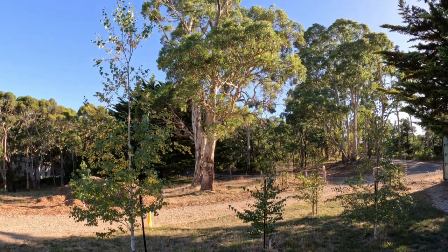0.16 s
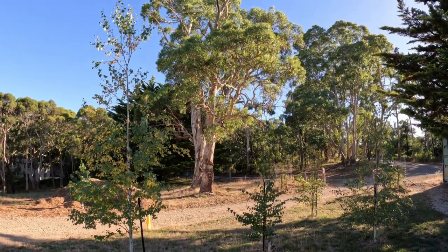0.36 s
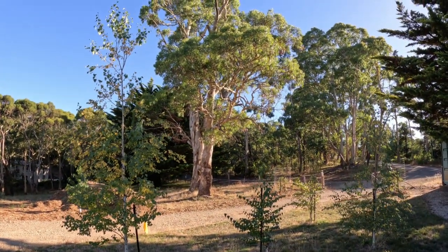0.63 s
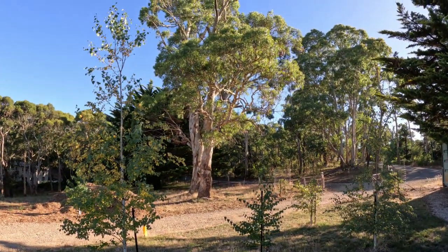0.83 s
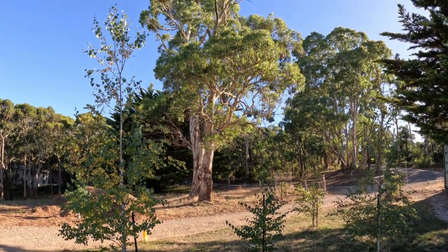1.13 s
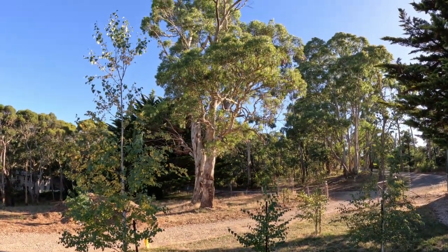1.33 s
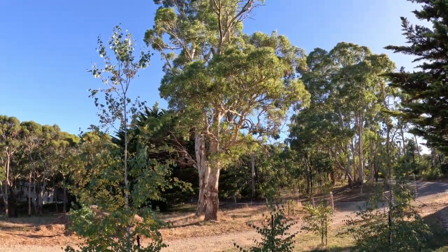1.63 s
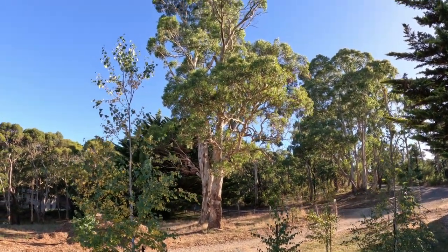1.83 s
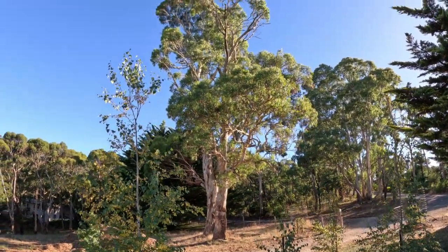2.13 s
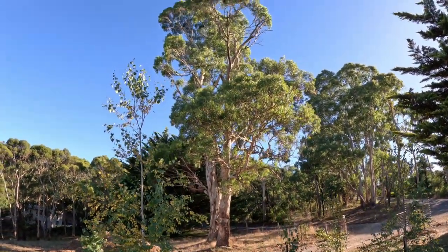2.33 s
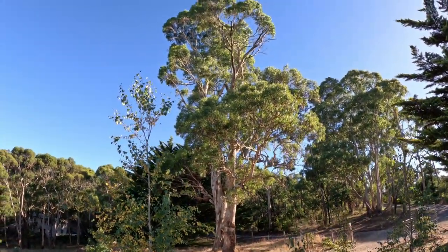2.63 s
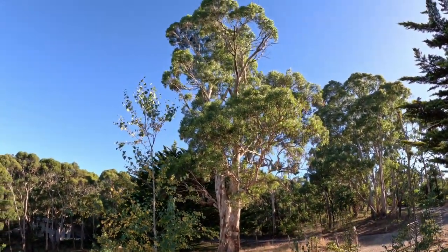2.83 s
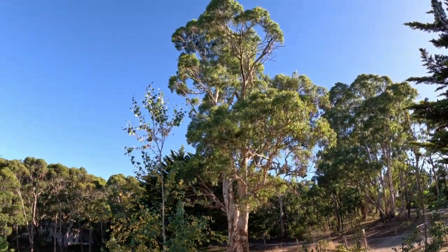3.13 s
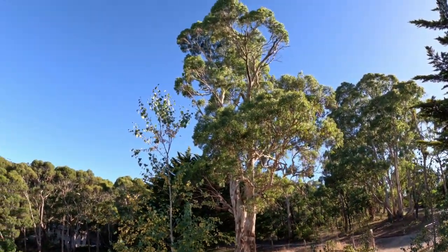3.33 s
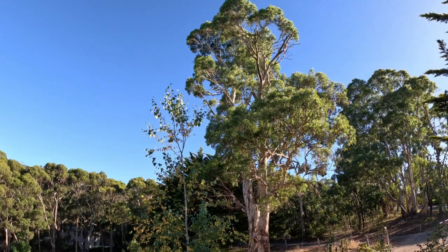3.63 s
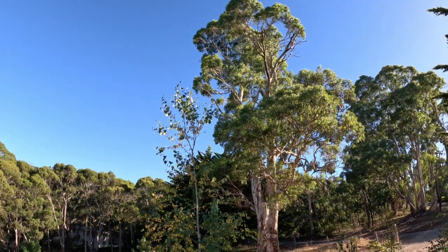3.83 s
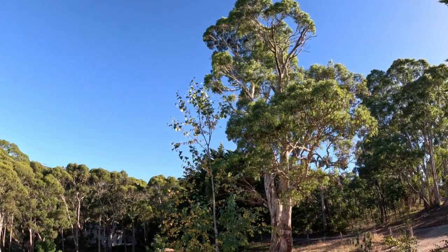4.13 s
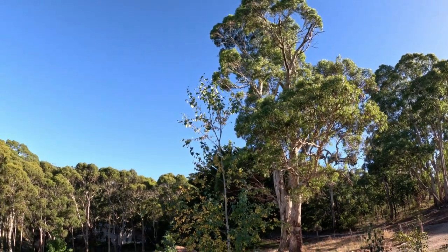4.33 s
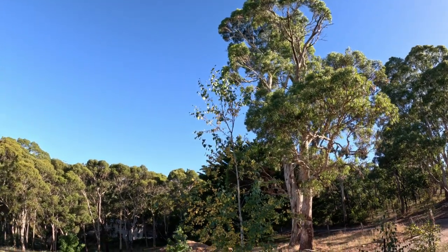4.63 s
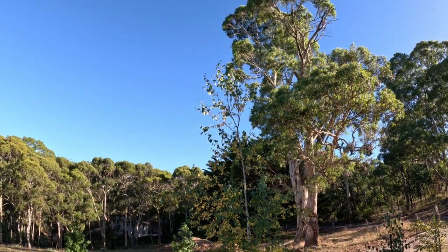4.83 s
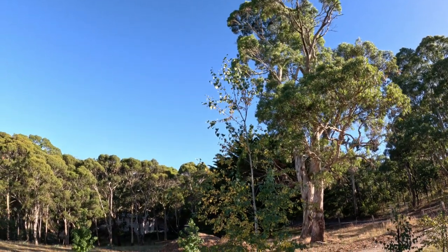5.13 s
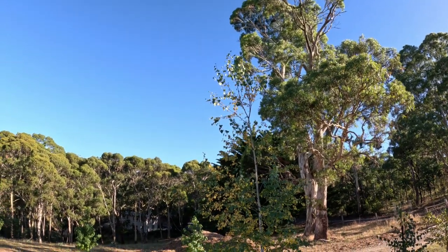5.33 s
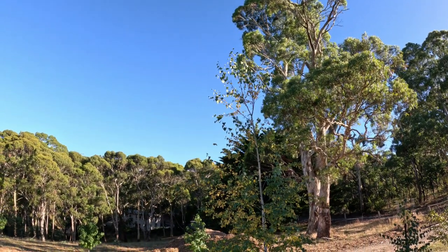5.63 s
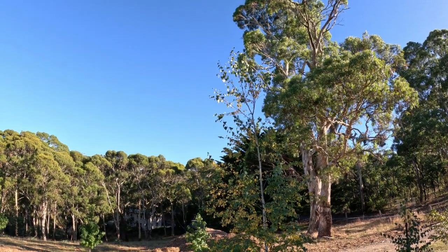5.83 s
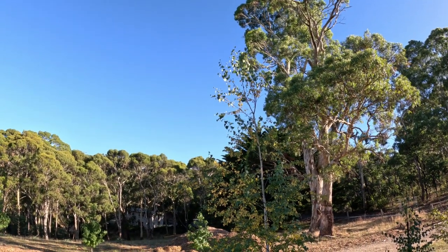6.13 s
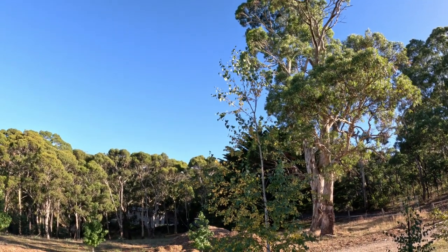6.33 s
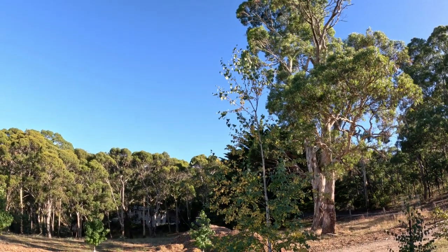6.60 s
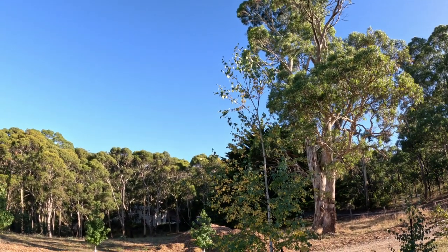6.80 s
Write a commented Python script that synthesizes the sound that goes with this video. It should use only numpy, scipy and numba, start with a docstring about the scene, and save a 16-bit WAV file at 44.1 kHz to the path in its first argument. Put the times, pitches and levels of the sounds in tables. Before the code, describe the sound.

Outdoors among scattered eucalypts, a cockatoo is already screeching as the stereo hand-held microphone is knocked with low, boomy thumps. More birds join in a nearly continuous run of rough, bright, rasping calls, shifting slightly left and right. Brief thin squeals and a quick falling squawk near six seconds add variety. Trunks and leaves scatter a soft diffuse tail over distant flock noise, light early wind buffeting and faint low rumble.

```python
"""A cockatoo is already screeching as hard bumps thud on the hand-held microphone; others follow from tall gum trees.
Each screech is a ragged train of pulses through the bird's throat, scattered by trunks and leaves.
Short clear squeals are gliding harmonic tones, and a late squawk slides down through fixed resonances.
Beneath lie a farther flock, a light breeze, rumble, hum and a passing drone, all shaped from noise."""
import sys
import numpy as np
from scipy import signal
from scipy.fft import rfft, irfft, next_fast_len
from scipy.io import wavfile
from scipy.ndimage import map_coordinates
from numba import njit

SR = 44100
rng = np.random.default_rng(int(sys.argv[2]) if len(sys.argv) > 2 else 0)


def wav_record(signal):
    """Record a signal, one row per channel, as 16-bit PCM in the file named by sys.argv[1]."""
    frames = np.transpose(np.atleast_2d(signal))
    bounded = np.clip(frames, -1, 1)
    # unit amplitude maps onto the largest positive 16-bit level
    quanta = np.round(bounded * 32767).astype(np.int16)
    wavfile.write(sys.argv[1], SR, quanta)


N = 306936
TOP_HZ = 15200  # upper limit of the sound


def amp(db):
    """Decibels to gain."""
    return 10 ** (np.asarray(db) / 20)


def unit(x):
    """Scale to rms 1."""
    return x / np.sqrt(np.mean(x ** 2) + 1e-20)


def along(points, hz):
    """(Hz, value) points read on a log axis."""
    f, v = np.transpose(points)
    return np.interp(np.log(hz + 1), np.log(f + 1), v)


def curves(rows):
    """One value per sample for each column after the time."""
    s, *cols = np.transpose(rows)
    return [np.interp(np.arange(N) / SR, s, c) for c in cols]


def wobble(rate, n):
    """A smooth random curve of n samples, rate knots a second."""
    knots = rng.standard_normal(int(n * rate / SR) + 4)
    return map_coordinates(knots, [np.arange(n) * rate / SR])


def filtered(x, gain):
    """x times a gain of frequency."""
    n = x.shape[-1]
    m = next_fast_len(n + 4096)
    return irfft(rfft(x, m) * gain(np.fft.rfftfreq(m, 1 / SR)), m)[..., :n]


def noise_band(shape, centre_hz, width_hz):
    """Noise of rms 1 in a bell-shaped band."""
    bell = lambda hz: np.exp(-((hz - centre_hz) / width_hz) ** 2)
    return unit(filtered(rng.standard_normal(shape), bell))


def spread(spectrum, side_db):
    """Stereo noise of rms 1 with the given spectrum; side_db sets its width."""
    noise = filtered(rng.standard_normal((2, N)), lambda hz: amp(along(spectrum, hz)))
    mid, side = noise * amp([[0], [side_db]])
    return unit(np.array([mid + side, mid - side]))


def placed(x, pan_db, centre_lag=0.32, lag_per_db=0.09):
    """Stereo from mono: the left is louder by pan_db, and its lag in samples grows with pan_db."""
    lag = centre_lag + lag_per_db * pan_db
    left = map_coordinates(x, [np.arange(len(x)) - lag], mode="nearest")
    return np.array([left, x]) * amp([[pan_db / 2], [-pan_db / 2]])


@njit
def bandpass(x, tuning, damping):
    """A two-pole resonator that is retuned at every sample."""
    out, a, b = np.zeros(len(x)), 0.0, 0.0
    for i in range(len(x)):
        g, k = tuning[i], damping[i]
        band = (g * (x[i] - b) + a) / (1 + g * (g + k))
        a, b = 2 * band - a, b + 2 * g * band
        out[i] = k * band
    return out


def resonance(x, hz, db, width):
    """Raise one resonance in x; hz and db may move, width is a share of hz that narrows as db rises."""
    ones = np.ones(len(x))
    tuning = ones * np.tan(np.pi * hz / SR)
    damping = ones * width / amp(db / 2)
    return x + (amp(db) - 1) * bandpass(x, tuning, damping)


def syrinx(n, rate, rough, drift=.14, jitter=.22, scatter_db=1.1, hiss=0.96, alternate_db=-1.5, puff_hz=9500):
    """Sharp pulses of uneven spacing and size, strong and weak by turns, each followed by a duller puff of turbulence."""
    unevenness = drift * wobble(25, n) + jitter * wobble(260, n)
    cycles = np.cumsum(rate * np.exp(rough * unevenness)) / SR
    pulses = unit(np.diff(np.floor(cycles), prepend=0))
    puffs = unit(rng.standard_normal(n) * np.exp(-1.1 * (cycles % 1)))  # fading through each cycle
    puffs = filtered(puffs, lambda hz: 1 / np.sqrt(1 + (hz / puff_hz) ** 4))
    share = np.clip(hiss * rough, 0, .9)
    size_db = scatter_db * np.tanh(wobble(300, n)) + alternate_db * np.cos(np.pi * np.floor(cycles))
    return (np.sqrt(1 - share) * pulses + np.sqrt(share) * puffs) * amp(rough * size_db)


# broad colour of the throat: pitch_hz [Hz], gain_db [dB]
THROAT = [(240, -60), (400, -33.5), (712, -19), (841, -22.5), (935, -13), (1070, -15.5), (1590, -13.5),
          (1830, -10), (2130, -3.5), (2920, -2.5), (5270, -9), (7240, -17), (8300, -25), (9810, -27.5),
          (11200, -41), (15000, -49.5)]


def throat(x, size=2048):
    """Give x the broad colour of the throat."""
    gain = amp(along(THROAT, np.fft.rfftfreq(size, 1 / SR)))
    cepstrum = irfft(np.log(gain + 1e-6))
    cepstrum[1:size // 2] *= 2
    cepstrum[size // 2 + 1:] = 0  # causal: the ringing follows each pulse
    return signal.fftconvolve(x, irfft(np.exp(rfft(cepstrum))))[:len(x)]


def flutter(x, depth_db, bins=2.2, frames=10, size=512):
    """Narrow streaks of the spectrum swell and fade at random."""
    overlap = size * 3 // 4
    z = signal.stft(x, nperseg=size, noverlap=overlap)[2]
    bell = lambda w: np.exp(-.5 * (np.arange(-40, 41) / w) ** 2)
    streak = np.outer(bell(bins / 2), bell(frames / 2))
    field = signal.fftconvolve(rng.standard_normal(z.shape), streak, "same")
    return signal.istft(z * amp(depth_db * unit(field)), nperseg=size, noverlap=overlap)[1][:len(x)]


def steady(x, hold=0.0082):
    """Divide x by its short-time strength, so that a cry stays level beneath its ragged pulses."""
    power = signal.fftconvolve(x * x, np.hanning(int(2 * hold * SR) + 3), "same")
    return x / np.sqrt(abs(power) + 1e-12)


def bend(x, octaves):
    """Slide all frequencies of x along a curve, keeping its length."""
    place = np.cumsum(2 ** octaves)
    return map_coordinates(x, [place * (len(x) - 1) / place[-1]], mode="mirror")


def gate(t, start, end, attack, release):
    """Rounded rise after start, hold, and rounded fall to end."""
    return np.sin(np.pi / 2 * np.clip(np.minimum((t - start) / attack, (end - t) / release), 0, 1))


CRESCENDO_POWER = 2.8  # the push comes late in the cry
RASP_GROWS, LOW_GROWS = 1.1, 0.96  # dB of rasp and of low throat for each dB of effort
# a strong rasp reaches higher: dB per octave of tilt for each dB above the usual rasp level (dB)
RASP_TILT, USUAL_RASP_DB = 0.34, -44
# each resonance strays on its own: share of its frequency at full roughness, knots per s, strength (dB)
WANDER, WANDER_PER_S, RING_WAVER_DB = 0.021, 17.8, 1.7
# the cries, levels before the mix: start_s, end_s, attack_s, release_s [s], level_db, crescendo_db [dB],
# low_db, rasp_db [dB against the main band], pan_db [dB, plus = left], rate [pulses per s, before drift],
# rough [0-1], glide [octaves from start to end], low_ring_db (lowest resonance), first_db, last_db
# (middle two, at start and end), top_ring_db (highest) [dB, before waver], four throat resonances [Hz]
SCREECHES = [ (-.1, 0.239, .05, 0.024, -35, -1, -11, -11, 2.5, 267, 0.85, 0.035, 9.5, 7.4, 1.8, 2.4, 1100, 1840, 3240, 5400),
             (.2, 0.516, 0.062, 0.043, -32, -1.5, -12.5, -12.5, 1.5, 267, 0.78, -0.022, 17, 5, 5, 4.6, 1174, 2050, 3000, 3450),
             (0.429, 0.975, 0.11, .074, -30, -1, -14.5, -13.5, 0, 240.5, 0.82, 0.051, 7.2, 7.5, 2.5, 2.9, 1230, 2380, 3040, 3720),
             (0.881, 1.271, 0.14, 0.096, -30.5, -4, -17.5, -10.5, 2, 276, 0.85, -0.06, 5.7, 2.5, 4, 5.5, 1100, 2300, 2950, 5150),
             (1.234, 1.551, 0.022, 0.075, -31, 0, -11, -11, -0.5, 161.2, 0.87, -0.052, 7.6, 15.6, 7, 4.5, 1156, 2180, 3190, 4280),
             (1.479, 1.68, 0.092, 0.045, -30, -1, -10.5, -10.5, 1, 150.5, 0.86, -.04, 4.7, 8, 7.1, 2.9, 1140, 2100, 3070, 4180),
             (1.65, 2.0, 0.051, 0.04, -29.3, -1.5, -16.5, -10.5, 4.5, 350.2, 0.8, 0.023, 11, 2.8, 4, 4, 1084, 2420, 3290, 4730),
             (1.969, 2.303, .064, 0.12, -42.5, 5.5, -8, -12, 0.5, 301.7, 0.77, 0.024, 16, 3, 3, 2, 1090, 2510, 3280, 5000),
             (2.19, 2.655, 0.1, 0.015, -31, 3, -16, -9, 3, 534.6, 0.71, .02, 11, 5.8, 1, 4.5, 1060, 2360, 3030, 4020),
             (2.629, 2.942, 0.081, 0.094, -30, 2, -18, -13.5, 0, 348.8, 0.73, -0.036, 3.4, 1, 1, 2.2, 1250, 2230, 3450, 4300),
             (2.84, 3.219, 0.12, 0.071, -26.8, -3, -16, -13, 1.5, 379.6, 0.82, -0.041, 7.2, 1.5, 1, 1.3, 1100, 2240, 3650, 4370),
             (3.15, 3.343, 0.085, 0.043, -27, 1, -20, -9, 3, 396.5, 0.73, 0.038, 6.7, 2.3, 1.7, 4, 1080, 2200, 3720, 9000),
             (3.297, 3.613, 0.046, 0.036, -32.5, 1, -16.5, -15.5, 3.5, 411.3, .72, -0.03, 9.9, 5.6, 2.5, 3.4, 1030, 2020, 2750, 4300),
             (3.555, 4.067, .038, .08, -28, 4.5, -12, -13, 1, 339, .8, .06, 9, 1, 2.5, 2, 1280, 2480, 2850, 3800),
             (3.985, 4.302, .03, .07, -30.5, 5.5, -14, -13, -.7, 310, 0.65, .09, 8.9, 2.3, 3, 5.4, 1450, 2620, 2900, 3850),
             (4.274, 4.481, 0.058, 0.078, -29, -7, -18, -8, .5, 313, .78, -0.0094, 2.6, 3.1, 2, 1.6, 1100, 2450, 3530, 4950),
             (4.605, 4.878, 0.11, 0.055, -36, 0.5, -14, -8.5, 0, 312.6, .74, .05, 7, 10, 12, 7.3, 960, 1850, 2770, 3700),
             (4.77, 5.186, 0.18, 0.097, -25.5, 0, -14.5, -12.5, 0, 559.5, .66, 0.033, 9, 4, 3.5, 4.8, 1100, 2330, 3170, 3970),
             (5.08, 5.329, 0.13, 0.027, -25, 0.5, -16.5, -12.5, -.5, 525.6, 0.62, 0.019, 5.5, 9.7, 4.7, 7, 1120, 2350, 3150, 3480),
             (5.436, 5.792, 0.096, 0.073, -30, 1, -11.5, -16.5, -4, 253.1, .64, -0.027, 9.3, 8.3, 10.5, 7.9, 1295, 2550, 3460, 7300),
             (5.69, 5.903, .11, .022, -27.8, 2, -15, -14.5, -3, 272, .6, -.02, 8, 12, 14, 9, 1300, 2450, 3300, 3620),
             (5.96, 6.419, 0.12, 0.15, -33.5, 2.5, -11.5, -11, -3, 378.3, 0.8, .12, 9, 10, 1.4, 3.7, 1160, 1880, 2440, 5100),
             (6.509, 6.841, 0.15, 0.12, -30, 4.5, -13, -13, -0.8, 343, 0.78, 0.041, 7, 8.8, 7.9, 3.4, 995, 2130, 3120, 3940),
             (6.771, 7.05, 0.1, .04, -23.5, -2, -11.5, -14.5, -2, 319.8, 0.81, -0.025, 7.8, 1.8, 2.8, 0.67, 1220, 2450, 2870, 4240)]


def screeches(low_hz=1500, high_hz=4600, width=0.25, tremor=0.01444, waver_db=0.43):
    """Each cry opens, changes in effort and breaks off; resonances glide and stray as beak and tongue move."""
    t, out = np.arange(N) / SR, np.zeros((2, N))
    below = lambda hz, edge: 1 / (1 + (hz / edge) ** 10)
    split = lambda hz: np.array([below(hz, low_hz), below(hz, high_hz) - below(hz, low_hz), 1 - below(hz, high_hz)])
    for (start, end, attack, release, db, crescendo_db, low_db, rasp_db, pan_db, rate, rough, glide,
         low_ring_db, first_db, last_db, top_ring_db, *peaks_hz) in SCREECHES:
        on = (t > start) & (t < end)
        n = on.sum()
        voice = throat(syrinx(n, rate, rough))
        middle_db = np.linspace(first_db, last_db, n)
        for hz, peak_db in zip(peaks_hz, [low_ring_db, middle_db, middle_db, top_ring_db]):
            stray_hz = hz * np.exp(WANDER * rough * wobble(WANDER_PER_S, n))
            ring_db = peak_db + RING_WAVER_DB * wobble(WANDER_PER_S, n)
            voice = resonance(voice, stray_hz, ring_db, width * rough)  # cleaner cries ring more sharply
        voice = steady(flutter(voice, depth_db=1.6))
        voice = bend(voice, glide * np.linspace(-.5, .5, n) + tremor * rough * wobble(18, n))

        progress = np.clip((t[on] - start) / (end - release - start), 0, 1)
        effort_db = crescendo_db * progress ** CRESCENDO_POWER + waver_db * wobble(28.0, n)
        tilt_db = RASP_TILT * (db + rasp_db - USUAL_RASP_DB)
        tilt = lambda hz: amp(tilt_db * np.log2(np.maximum(hz / high_hz, 1)))
        low, main, rasp = (unit(band) for band in filtered(voice, lambda hz: split(hz) * tilt(hz)))
        cry = low * amp(low_db + LOW_GROWS * effort_db)
        cry += main * amp(effort_db)
        cry += rasp * amp(rasp_db + RASP_GROWS * effort_db)
        out[:, on] += placed(amp(db) * cry * gate(t[on], start, end, attack, release), pan_db)
    return out


# decay of the scattered sound: pitch_hz [Hz], t60_s [s to fall 60 dB, before stretch]
WOODS = [(300, 0.18), (2500, 1), (6000, 0.41), (12000, 0.33)]


def echoes(x, stretch, side_db, count=40):
    """Trunks and leaves scatter the calls as decaying noise; the paths change as birds and microphone move."""
    out, place = np.zeros((2, N + SR)), np.linspace(0, count - 1, N)
    for k in range(count):
        on = np.flatnonzero(abs(place - k) < 1)
        hz, t, z = signal.stft(rng.standard_normal((2, SR // 3)), SR, nperseg=256)
        t60 = stretch * along(WOODS, hz)[:, None]
        tail = signal.istft(z * amp(-60 * t / t60), SR, nperseg=256)[1]
        mid, side = tail / np.linalg.norm(tail[0]) * amp([[0], [side_db]])
        piece = x[:, on] * np.cos(np.pi / 2 * (place[on] - k))  # crossfade from path to path
        wet = signal.fftconvolve(piece, np.array([mid + side, mid - side]), axes=1)
        out[:, on[0]:on[0] + wet.shape[1]] += wet
    return out[:, :N]


# colour of the far birds: pitch_hz [Hz], level_db [relative dB per Hz]
FLOCK = [(300, -47), (500, -25), (700, -10), (850, -7.5), (1050, -0.5), (1500, -2.5), (2000, 5.5),
         (2900, -1.5), (4300, -5), (6000, -13), (8000, -26.5), (11000, -42), (15000, -71)]


def flock(level_db=-40):
    """Far birds blur into a wavering wash of noise."""
    waver_db = 1.3 * wobble(11, N)
    return amp(level_db + waver_db) * spread(FLOCK, side_db=-11.5)


# colours of wind buffet and rumble: pitch_hz [Hz], level_db [relative dB per Hz]
BUFFET = [(12, -57), (20, 2), (48, 10), (63, 7), (166, -21.5), (264, -31), (400, -50), (520, -66),
          (880, -120)]
RUMBLE = [(12, -22), (25, 1), (60, 5), (90, 1.5), (108, -15), (135, -2.5), (220, -10), (330, -19.5),
          (500, -25), (900, -62)]
# gusts of breeze: peak_s [s], half_length_s [s from peak to 1/e], level_db [dB, before flutter]
GUSTS = [(0.144, 0.53, -37), (.77, 0.053, -46), (1.344, 0.23, -40), (1.73, 0.17, -39.5)]


def air(rumble_db=-49.5):
    """A distant low rumble, and gusts that rise and die, buffeting each microphone port in its own way."""
    t = np.arange(N) / SR
    breeze = sum(amp(db) * np.exp(-((t - s) / length) ** 2) for s, length, db in GUSTS)
    gusts = breeze * amp(3 * wobble(13, N))
    buffet = spread(BUFFET, side_db=-9)
    rumble = spread(RUMBLE, side_db=-12)
    return gusts * buffet + amp(rumble_db) * rumble


def hum(db=-58, centre_hz=108, width_hz=7):
    """A faint, unsteady low hum of narrow noise hangs in the distance."""
    return amp(db) * noise_band(N, centre_hz, width_hz)


# bumps on the housing, levels before its response: start_s [s], level_db [dB],
# push_s [s, the push peaks at twice this], scrape_db [dB]
BUMPS = [(.008, -14.5, 0.00029, -44), (0.0115, -7.5, 0.0004, -38), (.172, -15, 0.00071, -53),
         (.399, -30, .0016, -55), (0.413, -28, 0.00085, -37), (0.42, -25.5, 0.00087, -45),
         (0.4626, -15.5, 0.0027, -50), (0.4669, -10.5, 0.00048, -32), (.492, -20, 0.002, -45),
         (.506, -19, 0.00064, -41), (.805, -35, .0028, -60), (1.246, -26, 0.0016, -59),
         (1.414, -23.5, 0.0025, -61), (1.746, -28, 0.0014, -58)]


def bumps(sway_hz=30, damping=0.71, scrape_s=0.016, scrape_hz=560, left_hz=150,
          body_hz=112, body_db=4, body_width=0.38):
    """A dull push with a short scrape of the fingers; the housing booms and sways back, duller at the left port."""
    t, push = np.arange(N) / SR, np.zeros(N)
    grit = unit(filtered(rng.standard_normal(N), lambda hz: 1 / (1 + (hz / scrape_hz) ** 2)))
    for s, db, rise, scrape_db in BUMPS:
        age = np.maximum(t - s, 0)
        u = age / rise
        push += amp(db) * 2 * u * u * np.exp(-u)
        push += amp(scrape_db) * grit * (t > s) * np.exp(-age / scrape_s)
    sway = lambda hz: -hz ** 2 / (sway_hz ** 2 - hz ** 2 + 1j * damping * sway_hz * hz)
    right = filtered(resonance(push, body_hz, body_db, body_width), sway)
    left = filtered(right, lambda hz: 1 / (1 + 1j * hz / left_hz))
    return np.array([left, right])


# clear squeals, levels before the mix: start_s, end_s [s], first_hz, last_hz (pitch before waver) [Hz],
# peak_hz (resonance) [Hz], peak_db [dB], rough [0-1], level_db [dB], pan_db [dB, plus = left]
SQUEALS = [ (.015, .13, 3090, 3210, 9400, 16, .3, -42, 0), (.829, 0.897, 525, 524, 1060, 11, 0.9, -32, -2),
           (1.942, 2.003, 662, 612, 1260, 15, 0.8, -39, 3),
           (2.606, 2.671, 630, 790, 1440, 17, 0.77, -33, -1),
           (2.71, 2.885, 2940, 2860, 2900, 3, .3, -36.5, -3), (3.38, 3.5, 3720, 3690, 3700, 6, .45, -41, 2),
           (3.48, 3.6, 4150, 3520, 3940, 1, .5, -39.5, 0), (3.98, 4.13, 655, 685, 1340, 20, 0.7, -40, 0),
           (4.15, 4.271, 775, 705, 1490, 18, 0.65, -36.5, 1),
           (4.31, 4.375, 3680, 3560, 3600, 3, .4, -39, 0),
           (5.275, 5.324, 1060, 1192, 3380, 14, 0.54, -30, -1.2),
           (5.79, 5.9, 2440, 2390, 2420, 6, .4, -34, -3.5),
           (5.81, 5.903, 3500, 3430, 6900, 9, .55, -32, -3.5)]


def squeals(waver=0.0384, width=0.26, soft_hz=4400, shimmer_db=2.5):
    """Now and then the syrinx locks into a nearly regular, gliding vibration."""
    t, out = np.arange(N) / SR, np.zeros((2, N))
    for start, end, first_hz, last_hz, peak_hz, peak_db, rough, db, pan_db in SQUEALS:
        on = (t > start) & (t < end)
        n = on.sum()
        pitch_hz = np.linspace(first_hz, last_hz, n) * (1 + waver * rough * wobble(401, n))
        phase = 2 * np.pi * np.cumsum(pitch_hz) / SR
        harmonics = range(1, int(TOP_HZ / last_hz))
        buzz = sum(np.cos(k * phase) / np.sqrt(1 + (k * last_hz / soft_hz) ** 6) for k in harmonics)
        buzz = unit(buzz) * amp(shimmer_db * wobble(485, n)) + rough * rng.standard_normal(n)
        squeal = unit(resonance(throat(buzz), peak_hz, peak_db, width))
        out[:, on] += placed(amp(db) * squeal * signal.windows.tukey(n, .5), pan_db)
    return out


# housing ticks: peak_s [s], level_db [dB]
TICKS = [(0.463, -42), (0.467, -39.5)]


def tick(length=0.00081, centre_hz=11900, width_hz=1400):
    """Two bumps make the housing tick thinly, as brief puffs of high noise."""
    t = np.arange(N) / SR
    fizz = noise_band((2, N), centre_hz, width_hz)
    return fizz * sum(amp(db) * np.exp(-((t - s) / length) ** 2) for s, db in TICKS)


def swell(s=2.66, length=0.43, db=-57, centre_hz=205, width_hz=70):
    """A faint low drone of noise rises and passes."""
    drone = noise_band(N, centre_hz, width_hz)
    return amp(db) * drone * np.exp(-((np.arange(N) / SR - s) / length) ** 2)


# the falling squawk, before the mix: time_s [s], pitch_hz [Hz, before waver], level_db [dB]
SQUAWK = [(5.885, 695, -48), (5.9, 665, -28), (5.92, 632, -29), (5.94, 600, -28.5), (5.957, 560, -30.5),
          (5.974, 490, -36), (5.992, 455, -50)]
# strength of its harmonics as they pass: pitch_hz [Hz], level_db [relative dB]
SQUAWK_THROAT = [(450, -21), (650, -16), (1250, -13), (1550, -1), (1950, -10), (2600, 1), (3150, -4),
                 (3700, 1), (4300, -1.5), (4900, -11), (5600, -17), (6500, -22), (7500, -15), (8300, -30)]


def squawk(waver=0.007, shimmer_db=2.5, rasp_db=-9, pan_db=-2.5, count=14):
    """One screech ends in a clearer voice whose harmonics slide down through the throat's resonances, over some rasp."""
    t, out = np.arange(N) / SR, np.zeros((2, N))
    on = (t > SQUAWK[0][0]) & (t < SQUAWK[-1][0])
    hz, db = (c[on] for c in curves(SQUAWK))
    n = len(hz)
    phase = 2 * np.pi * np.cumsum(hz * (1 + waver * wobble(500, n))) / SR
    voice = np.zeros(n)
    for k in range(1, count):
        harmonic_db = along(SQUAWK_THROAT, k * hz) + shimmer_db * wobble(118, n)
        voice += amp(harmonic_db) * np.cos(k * phase)
    rasp = unit(throat(rng.standard_normal(n)))
    out[:, on] = placed(amp(db) * (unit(voice) + amp(rasp_db) * rasp), pan_db)
    return out


def scene():
    """Near birds, their echoes from their own crown and from the woods all round, and the background."""
    birds = screeches() + squeals() + squawk()
    crown = echoes(birds, stretch=0.051, side_db=-4.5)
    woods = echoes(birds.mean(axis=0, keepdims=True), stretch=1.0, side_db=-2.0)
    heard = amp(-1.0) * birds + amp(-9.5) * crown + amp(-13.0) * woods
    return heard + flock() + air() + hum() + swell() + bumps() + tick()


def record(dry):
    """Keep only what lies below TOP_HZ."""
    return filtered(dry, lambda hz: hz < TOP_HZ)


dry = scene()
out = record(dry)
wav_record(out)
```